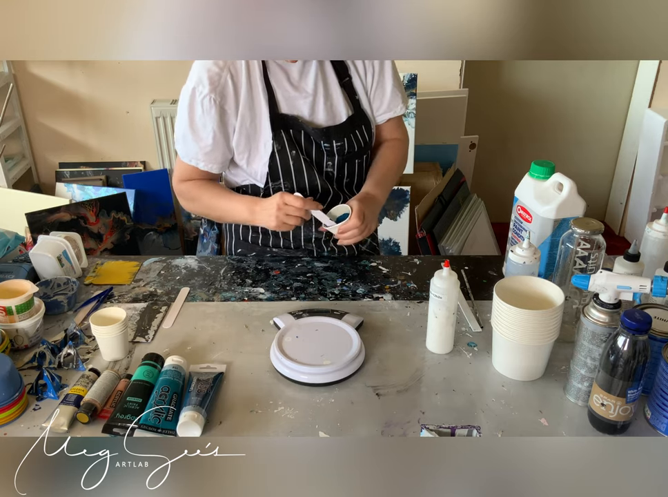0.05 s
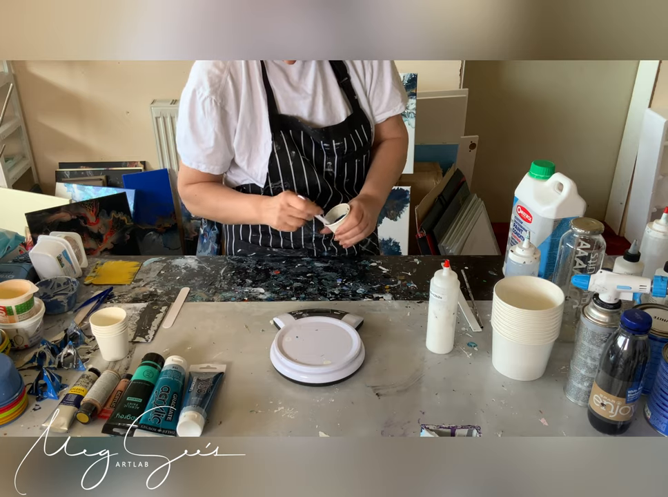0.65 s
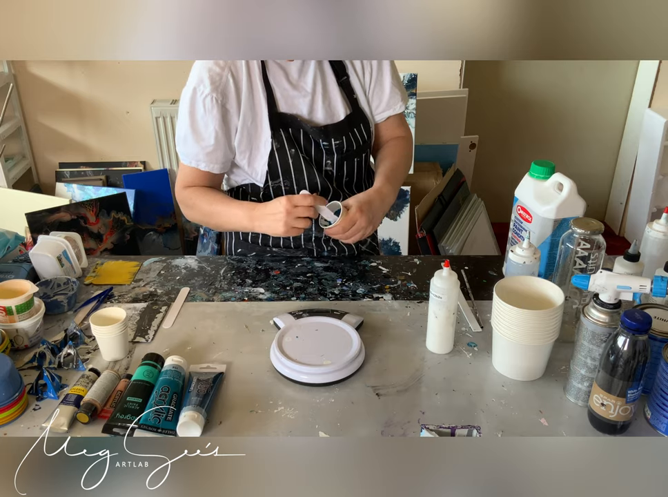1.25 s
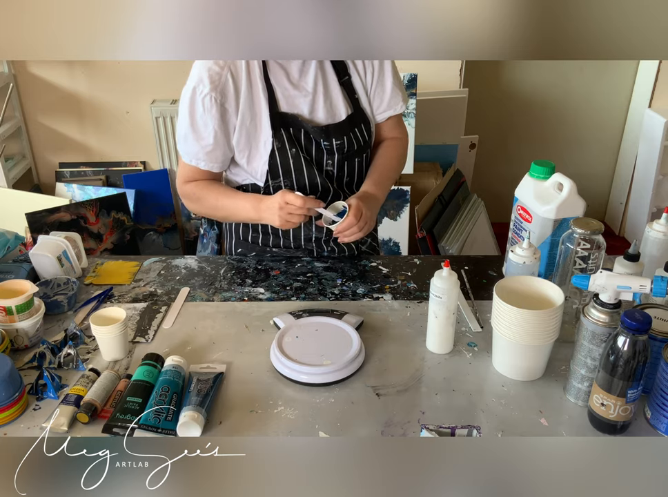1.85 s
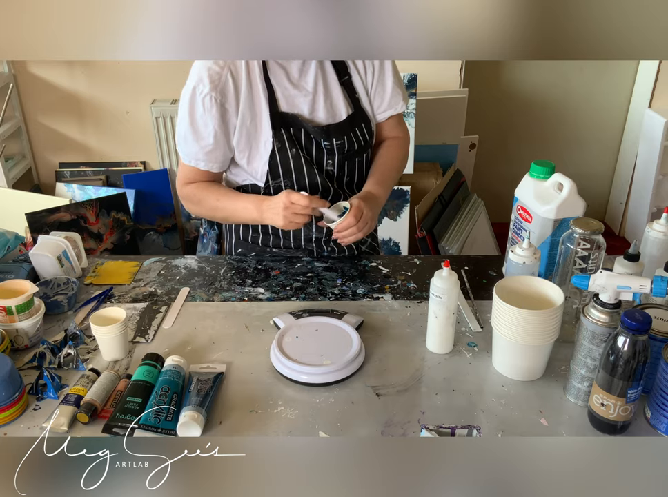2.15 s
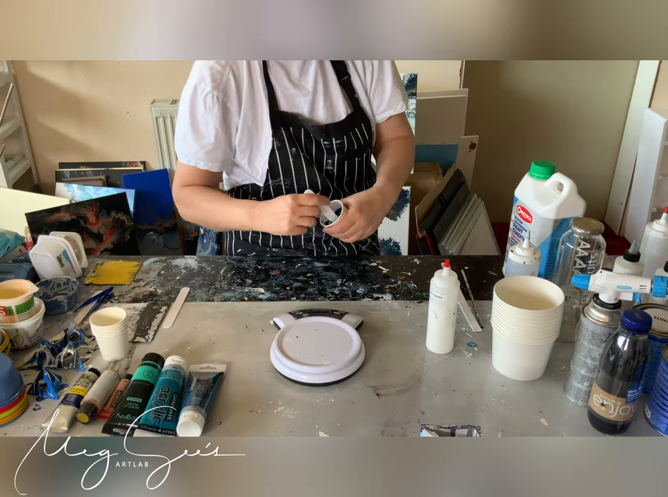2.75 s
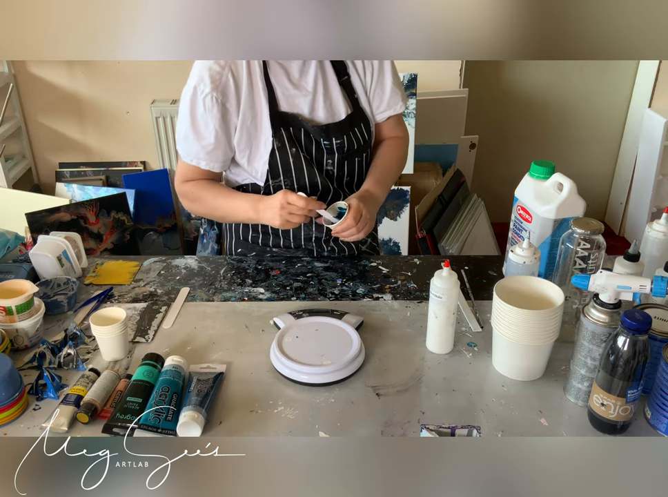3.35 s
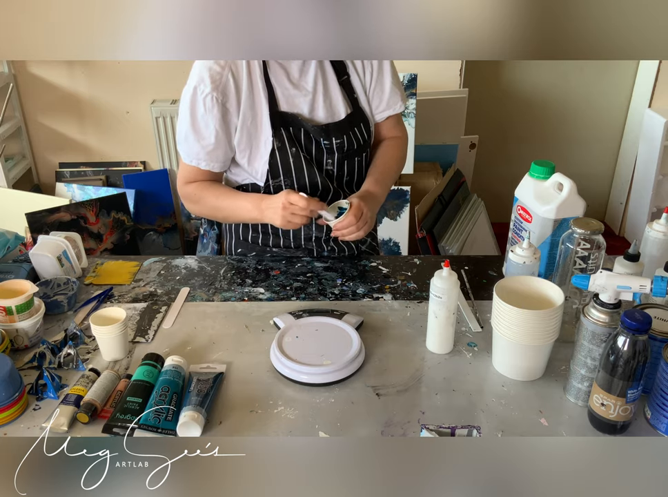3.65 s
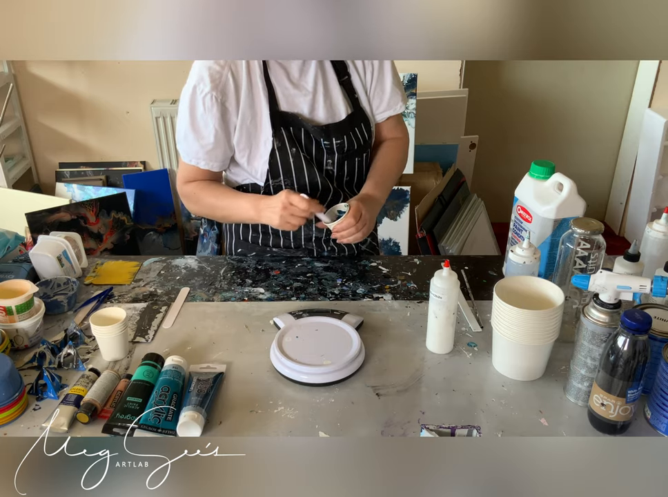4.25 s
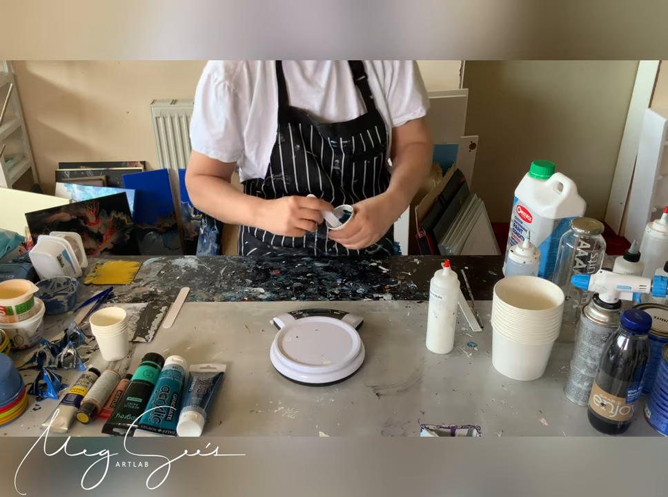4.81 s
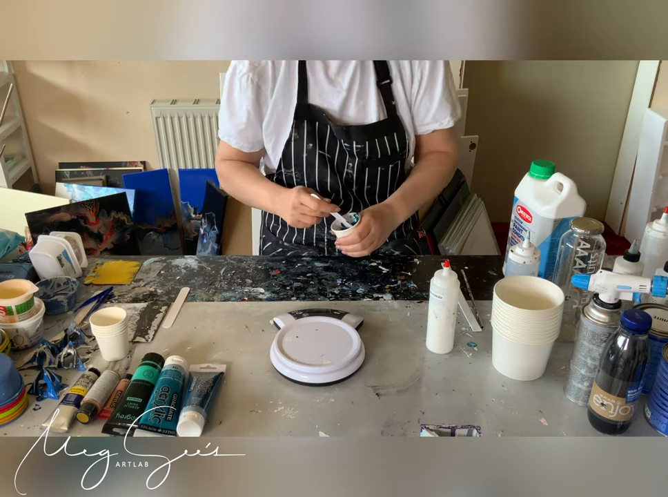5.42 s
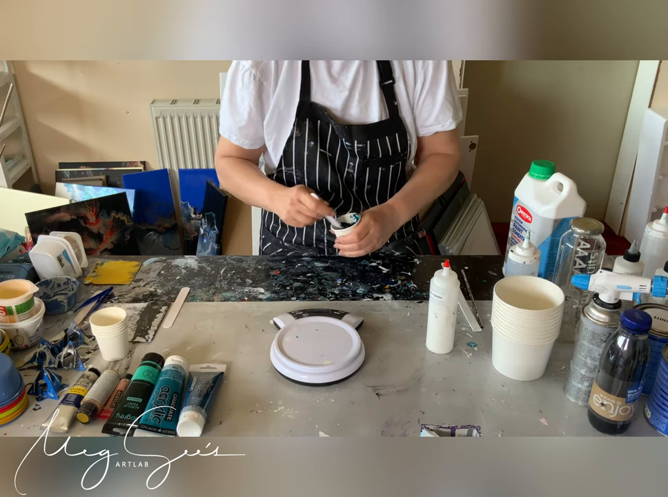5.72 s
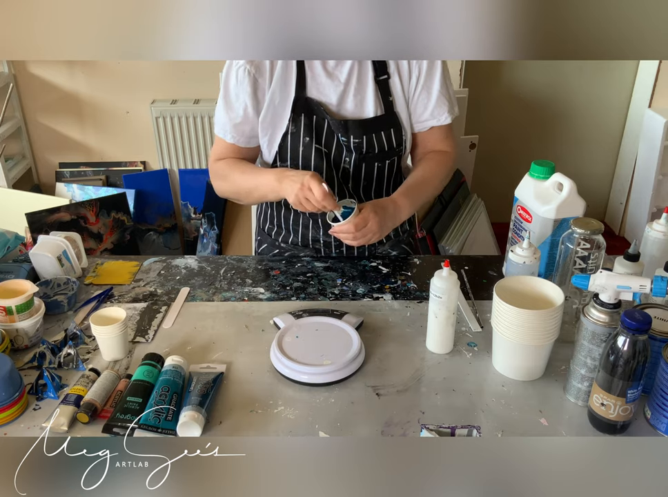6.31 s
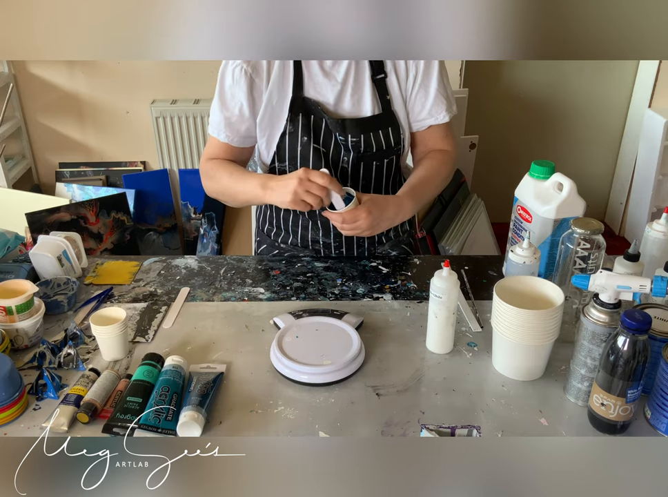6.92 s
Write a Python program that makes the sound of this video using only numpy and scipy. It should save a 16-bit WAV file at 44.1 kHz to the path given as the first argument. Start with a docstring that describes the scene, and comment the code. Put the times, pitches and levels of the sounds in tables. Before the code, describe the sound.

A plastic stick stirs thick paint in a paper cup with quick, wet scrapes, squelches and light ticks.

```python
"""Quick, wet scrapes: a plastic stick stirs thick paint in a hand-held paper cup, in a small work room.
Tiny slips along the wall hiss and shake the hollow cup, while the paint sizzles, squelches and snaps.
The stick ticks against the cup, and chatters into a thin singing note when wiped along the rim.
Midway the painter shifts her stance with a dull bump, and her apron rustles."""
import sys
import numpy as np
from scipy import signal
from scipy.fft import rfft, irfft, next_fast_len
from scipy.io import wavfile
from scipy.ndimage import uniform_filter1d, map_coordinates

SR = 44100
rng = np.random.default_rng(int(sys.argv[2]) if len(sys.argv) > 2 else 0)


def generate_wav(sig):
    """Save sig (samples, or channels by samples) to the path in sys.argv[1] as 16-bit PCM at SR."""
    pcm = np.round(np.clip(np.atleast_2d(sig).T, -1, 1) * 32767).astype(np.int16)
    wavfile.write(sys.argv[1], SR, pcm)


N = 316241
TIME = np.arange(N) / SR


def amp(db):
    """Decibels to gain."""
    return 10 ** (np.asarray(db) / 20)


def unit(x):
    """x at rms 1."""
    return x / np.sqrt(np.mean(x ** 2) + 1e-20)


def along(points, hz):
    """(Hz, value) points read on a log axis."""
    f, v = np.transpose(points)
    return np.interp(np.log(hz + 1), np.log(f + 1), v)


def curve(rows):
    """An automation curve through (time [s], value) rows."""
    return np.interp(TIME, *np.transpose(rows))


def swell(start, peak, end, db, swell_db, fade_db_per_s=1505):
    """Gain of one gesture: up by swell_db to its peak and back, with a fast fade either side."""
    outside = np.maximum(start - TIME, 0) + np.maximum(TIME - end, 0)
    below_peak_db = np.interp(TIME, [start, peak, end], [swell_db, 0, swell_db])
    return amp(db - below_peak_db - fade_db_per_s * outside)


def wobble(rate):
    """A smooth random curve, rate knots a second."""
    return map_coordinates(rng.standard_normal(int(N * rate / SR) + 4), [TIME * rate])


def slips(rate, spread_db):
    """Tiny random slips of uneven but bounded size, rate a second."""
    happens = rng.random(N) < rate / SR
    size = np.minimum(rng.standard_normal(N), 2)
    return unit(happens * rng.choice([-1, 1], N) * amp(spread_db * size))


def bursts(rows, t60_s):
    """A fast-dying burst of noise for each (time [s], level [dB]) row."""
    out, t = np.zeros(N + SR), np.arange(SR // 20) / SR
    for s, db in rows:
        out[round(s * SR):][:len(t)] += amp(db - 60 * t / t60_s) * rng.standard_normal(len(t))
    return out[:N]


def filtered(x, response):
    """x times a complex response of frequency."""
    size = next_fast_len(N + SR // 2)
    return irfft(rfft(x, size) * response(np.fft.rfftfreq(size, 1 / SR)), size)[..., :N]


def coloured(x, eq):
    """x through an EQ of (frequency [Hz], gain [dB]) points."""
    return filtered(x, lambda hz: amp(along(eq, hz)))


def ringing(x, hz, width_hz):
    """A band-pass resonance at a steady or moving frequency."""
    turn = np.exp(2j * np.pi * np.cumsum(np.broadcast_to(hz, N)) / SR)
    keep = np.exp(-np.pi * width_hz / SR)  # what is left of the ring after one sample
    return (turn * signal.lfilter([1 - keep, 1 - keep], [1, -keep], x / turn)).real


def resonance(x, hz, width_hz):
    """A ring with steep skirts, at rms 1."""
    return unit(ringing(ringing(x, hz, width_hz), hz, width_hz))


def modes(x, table):
    """x through a bank of steady resonances."""
    return sum(amp(db) * resonance(x, hz, width) for hz, width, db in table)


# colour of the room tone: (frequency [Hz], gain [dB])
ROOM_TONE_EQ = [(25, -21), (45, -2), (70, 11.5), (130, -1), (300, -4), (700, -14), (1400, -2.5),
                (2600, -19.5), (6000, -12.5), (16000, -23.5)]


def room_tone():
    """A bed of quiet air, nearly alike on both sides."""
    mid, side = unit(coloured(rng.standard_normal((2, N)), ROOM_TONE_EQ))
    side = amp(-11.5) * side
    return amp(-74.5) * np.array([mid + side, mid - side])


# reverb decay: (frequency [Hz], time to fall 60 dB [s])
ROOM_DECAY = [(150, 0.41), (1400, 0.39), (5000, 0.34), (14000, 0.21)]


def echo_tail():
    """A pair of room tails after a short pre-delay; each frequency dies at its own speed."""
    hz, t, spectra = signal.stft(rng.standard_normal((2, SR // 2)), SR, nperseg=256)
    decay = amp(-60 * t / along(ROOM_DECAY, hz)[:, None])
    tails = signal.istft(spectra * decay, SR, nperseg=256)[1]
    return np.pad(tails / np.linalg.norm(tails[0]), ((0, 0), (SR // 300, 0)))


# reverb return: (frequency [Hz], gain [dB])
ECHO_EQ = [(200, -1.5), (1300, -5), (3000, -12), (9000, -5.5)]
# reverb width: (frequency [Hz], side over mid [dB])
ECHO_WIDTH = [(60, -13), (300, -7), (800, 4.5), (1500, -3), (3000, -0.5), (12000, -7.5)]
# the room's low boom: (frequency [Hz], gain [dB])
STANDING_WAVES = [(119, 4), (147, -2), (196, 2.5), (288, -6), (311, -4)]


def room(x, renew_s=0.4):
    """Direct sound, standing waves and stereo echoes, whose pattern keeps changing as the hands move."""
    echo, step = np.zeros((2, N + 2 * SR)), round(renew_s * SR)
    padded = np.pad(x, (step, 2 * step))
    crossfade = np.sin(np.linspace(0, np.pi, 2 * step))
    for start in range(0, N + step, step):
        piece = crossfade * padded[start:start + 2 * step]
        wet = signal.fftconvolve(piece[None], echo_tail(), axes=1)
        echo[:, start:start + wet.shape[1]] += wet
    mid, side = coloured(echo[:, step:step + N], ECHO_EQ)
    mid = mid + sum(amp(db) * ringing(x, hz, width_hz=7.6) for hz, db in STANDING_WAVES)
    side = coloured(side, ECHO_WIDTH)
    return np.array([x + mid + side, x + mid - side])


# a low hum: (start [s], peak [s], end [s], level [dB], swell [dB])
HUM_SWELLS = [(5.78, 5.9, 6.08, -69, 6)]


def hum():
    """A faint, rough low tone comes and goes."""
    tone = unit(ringing(rng.standard_normal(N), hz=310, width_hz=13))
    return sum(swell(*row) for row in HUM_SWELLS) * tone


# cloth slides: (start [s], peak [s], end [s], level [dB], swell [dB])
APRON_SLIDES = [(4.83, 4.926, 5.23, -54, 13), (5.79, 5.82, 5.98, -63, 8), (6.18, 6.2, 6.24, -67, 3),
                (6.43, 6.6, 6.63, -64, 9)]
# soft colour of the cloth: (frequency [Hz], gain [dB])
CLOTH_EQ = [(50, -8), (130, -6), (320, 0), (800, -2), (1500, -2), (4000, -74)]


def apron():
    """Cloth slides on cloth with a fluttering rustle."""
    rustle = unit(coloured(amp(1.2 * wobble(40)) * rng.standard_normal(N), CLOTH_EQ))
    return sum(swell(*row) for row in APRON_SLIDES) * rustle


# shifts of weight: (start [s], peak [s], end [s], level [dB], swell [dB])
STANCE_SHIFTS = [(4.39, 4.475, 4.58, -44.5, 13), (4.625, 4.642, 4.68, -57, 12), (6.18, 6.225, 6.24, -69, 5)]
# dark colour of the bump: (frequency [Hz], gain [dB])
BUMP_EQ = [(25, -38), (70, -9), (110, -2), (145, -1), (200, -2.5), (300, -1), (550, -10), (1200, -13.5),
           (2500, -36)]


def stance():
    """The painter changes her stance with a dull, scuffing bump."""
    bump = unit(coloured(slips(rate=900, spread_db=2), BUMP_EQ))
    return sum(swell(*row) for row in STANCE_SHIFTS) * bump


# paint snaps: (time [s], level before EQ [dB])
SNAPS = [(2.191, -19), (2.199, -32), (5.935, -40), (6.069, -50), (6.207, -47)]
# colour of a snap: (frequency [Hz], gain [dB])
SNAP_EQ = [(200, -60), (1500, -18), (7000, 7), (15000, -7.5)]


def snapping():
    """Paint tears from the wall with a thin, bright snap."""
    return coloured(bursts(SNAPS, t60_s=0.0099), SNAP_EQ)


# the cup's air note: (time [s], pitch [Hz])
AIR_NOTE = [(0.0, 1625), (0.11, 1515), (2.32, 1490), (2.45, 1720), (2.63, 1540), (4.1, 1473), (5.63, 1430),
            (7.0, 1420)]
# modes of its wall and air: (pitch [multiple of the air note], width [Hz], gain [dB])
CUP_MODES = [(.33, 176, -22), (.67, 266, -18), (.88, 150, -5.5), (1.03, 130, 3.5), (1.42, 330, -16)]


def cup(x):
    """The hollow body of the paper cup; its note moves as stick and hand shade the opening."""
    note = curve(AIR_NOTE) * np.exp(0.012 * wobble(15))  # the circling stick nudges it
    return sum((-1) ** k * amp(db) * ringing(x, multiple * note, width)
               for k, (multiple, width, db) in enumerate(CUP_MODES))


# the stick taps the cup: (time [s], crack drive [dB], push on the wall [dB])
TAPS = [(0.2186, -36.5, -9), (0.2764, -35, -14), (0.349, -29, -17), (0.7769, -27.5, 13.5),
        (1.5925, -41, -28), (1.8803, -25, -9), (2.191, -34.5, 7.5), (3.401, -26.5, -11), (3.467, -42, 1),
        (3.587, -31.5, 0.5), (3.907, -32.5, -22), (4.685, -47.5, -15.5), (5.327, -31, -7.5),
        (5.3998, -40, -18), (5.4187, -30.5, -13), (5.935, -35, -15), (6.1747, -37.5, -8),
        (6.727, -50.5, -33)]
# modes of the cup's base: (frequency [Hz], width [Hz], level [dB])
BASE_MODES = [(960, 78, -9), (1260, 170, 3.5)]
BASE_DB, BASE_DECAY_DB_PER_S = -38, 328


def ticking():
    """Each tap is a dry crack, a knock on the cup and a thud of paint; the hardest flexes the base."""
    bites = bursts([tap[:2] for tap in TAPS], t60_s=0.012)
    pushes = np.zeros(N)
    for s, _, push_db in TAPS:
        pushes[round(s * SR)] += amp(push_db)
    age = TIME - max(TAPS, key=lambda tap: tap[2])[0]  # since the hardest push
    flex = (age > 0) * amp(BASE_DB - BASE_DECAY_DB_PER_S * np.abs(age))
    base = flex * modes(rng.standard_normal(N), BASE_MODES)
    crack = coloured(bites, FRICTION_EQ)
    knock = coloured(cup(pushes), [(150, -21), (650, -6), (1200, 0)])
    thud = amp(-0.5) * ringing(bites, hz=445, width_hz=180)
    return crack + knock + thud + base


# wipes along the rim:
# (start [s], rise [s], fall [s], level [dB], swell [dB], first pitch [Hz], last pitch [Hz])
RIM_WIPES = [(0.0, 0.017, 0.036, -48, 1, 3850, 3700), (1.2, 0.12, 0.2, -43.5, 19.5, 4080, 3690),
             (1.62, 0.12, 0.064, -49, 3.5, 4020, 3640), (2.428, 0.015, 0.023, -39, 15, 3500, 3680),
             (2.76, 0.1, 0.39, -52.5, 5, 3600, 3910), (4.78, 0.12, 0.19, -39, 10, 3660, 3480),
             (6.289, 0.27, 0.059, -43.5, 9, 3650, 3380), (6.796, 0.0077, 0.034, -36, 25, 4120, 4330),
             (6.85, 0.048, 0.072, -55.5, -1, 4380, 4030)]
# the rim's steady resonances: (frequency [Hz], width [Hz], level [dB])
RIM_MODES = [(1050, 560, -17), (4500, 520, -8), (5700, 420, -7.5), (8300, 2400, -10.5)]


def wiping():
    """On the rim the stick chatters, rasps and sings a note that glides with its free length."""
    pressure, glides = np.zeros(N), []
    for start, rise, fall, db, swell_db, first_hz, last_hz in RIM_WIPES:
        end = start + rise + fall
        pressure += swell(start, start + rise, end, db, swell_db)
        glides += [(start, first_hz), (end, last_hz)]
    # a light wipe stutters between sticking and sliding; a firm one runs smoothly
    stutter_db = 7 / (1 + pressure / amp(-48))
    chatter = unit(amp(stutter_db * np.tanh(wobble(220))) * slips(rate=2700, spread_db=6.5))
    pitch = curve(sorted(glides)) * np.exp(0.014 * wobble(37))  # wavers with the grip
    ring = unit(resonance(chatter, pitch, width_hz=260) + modes(chatter, RIM_MODES))
    rasp = amp(-16.5) * unit(coloured(chatter, FIZZ_EQ))
    return pressure * (ring + rasp)


def gurgle(force, ceiling_db=-69.5, firm_stroke_db=-42):
    """Air pockets open behind the blade at a wandering low pitch, levelling off at a firm stroke."""
    gain = amp(ceiling_db) * np.tanh(force / amp(firm_stroke_db)) ** 0.59
    pockets = amp(3 * wobble(25)) * slips(rate=330, spread_db=5.5)
    pitch = 430 * np.exp(0.21 * wobble(13))
    return gain * unit(ringing(pockets, pitch, width_hz=105))


# paint pressed against the wall: (crest [s], hiss [dB], cup tone [dB], sizzle [dB], build-up [s])
PAINT_SQUELCHES = [(0.094, -37, -44, -48, 0.018), (0.339, -36, -58, -44.5, 0.0081),
                   (0.401, -37.5, -46, -64, 0.0066), (0.547, -37, -43, -50.5, 0.023),
                   (0.584, -42, -48, -54, 0.005), (0.672, -43.5, -44, -70, 0.063),
                   (0.777, -35, -36, -43, 0.021), (0.88, -40, -76, -54, 0.023),
                   (0.987, -48.5, -61.5, -66, 0.015), (1.801, -51.5, -73, -48, 0.019),
                   (1.96, -31, -43.5, -46, 0.0073), (2.193, -33.5, -40, -43, 0.028),
                   (2.451, -36.5, -41, -47, 0.0084), (3.483, -33, -41, -42, 0.014),
                   (3.57, -44.5, -57, -57, 0.03), (3.714, -35, -39.5, -38.5, 0.02),
                   (3.795, -41, -61, -50, 0.028), (3.826, -43.5, -39, -51, 0.025),
                   (3.913, -41, -53, -63, 0.024), (3.936, -34.5, -48, -39.5, 0.014),
                   (3.965, -52, -56, -45, 0.0062), (4.007, -53, -43.5, -50, 0.0061),
                   (4.05, -41.5, -46, -49, 0.011), (4.157, -38.5, -54, -48, 0.021),
                   (4.19, -44, -68, -49, 0.0086), (4.278, -42, -50, -52.5, 0.059),
                   (4.398, -37.5, -40, -48, 0.024), (4.904, -38, -50, -40.5, 0.015),
                   (5.322, -43, -57, -63, 0.018), (5.442, -41.5, -50, -49, 0.0049),
                   (5.513, -42, -68, -61, 0.007), (5.539, -38, -46.5, -56, 0.021),
                   (5.64, -45, -64, -50.5, 0.04), (5.672, -61, -63, -49, 0.008),
                   (5.811, -49.5, -48, -65, 0.023), (5.885, -46.5, -54, -57, 0.018),
                   (6.557, -39.5, -75, -51, 0.025), (6.817, -47.5, -62, -50, 0.008)]
SLIP_OFF, ROUNDNESS = 0.58, 1.31  # fall time over build-up time; 1 = pointed crest, 2 = round


def squelches():
    """Power of hiss, cup tone and sizzle: each squelch builds, then drops as the blade slips off."""
    power = np.zeros((3, N))
    for crest, *levels_db, rise in PAINT_SQUELCHES:
        distance = np.abs(TIME - crest) / np.where(TIME < crest, rise, SLIP_OFF * rise)
        envelope = np.exp(-np.minimum(distance, 10) ** ROUNDNESS)
        power += np.outer(amp(levels_db), envelope) ** 2
    return power


# strokes over the wall:
# (start [s], end [s], first hiss [dB], last hiss [dB], cup tone over hiss [dB], sizzle over hiss [dB])
WALL_STROKES = [ (0.0, 0.064, -47.5, -58.5, 4, -6), (0.1, 0.123, -44, -48, -10, -4.5),
                (0.22, 0.282, -61, -60, -6, -5), (0.321, 0.472, -47, -50.5, -6, -5),
                (0.51, 0.675, -56, -48, -10, -4.5), (0.757, 0.917, -49, -59, -10, -5),
                (0.996, 1.114, -65, -69, -45, -4), (1.165, 1.255, -65.5, -56, -9.5, -6.5),
                (1.26, 1.407, -55, -53.5, -7.5, -0.5), (1.427, 1.55, -62.5, -57.5, -3, -13),
                (1.595, 1.805, -54, -54.5, -2.5, -14), (1.887, 1.945, -63, -48, -4.5, -7),
                (1.949, 1.986, -36.5, -44, -4.5, -9), (2.004, 2.105, -41, -47, -8.5, -5.5),
                (2.16, 2.309, -55, -44, -3.5, -12), (2.427, 2.452, -45.5, -49.5, 2.5, -1),
                (2.563, 2.674, -68, -74.5, -28, -7), (2.678, 2.732, -52.5, -56, -9.5, -6.5),
                (2.768, 3.173, -57.5, -53.5, -7, -8.5), (3.19, 3.282, -56, -49.5, 0, -4),
                (3.465, 3.62, -51.5, -47, -5.5, -9), (3.674, 3.86, -49.5, -55, -9, -6.5),
                (3.912, 4.106, -49, -50, -4.5, -15), (4.12, 4.302, -58.5, -46.5, -4, -14.5),
                (4.337, 4.451, -63, -48, -12, -2.5), (4.49, 4.634, -68, -57, -2.5, 1.5),
                (4.684, 4.763, -59, -44.5, -10, -1.5), (4.73, 4.93, -52, -47.5, -7.5, 0.5),
                (4.933, 5.213, -48, -49, -1, -7.5), (5.235, 5.31, -65, -53, 0, -4),
                (5.398, 5.485, -42.5, -57.5, -10, -3), (5.467, 5.679, -51, -48.5, -4, -16),
                (5.702, 5.9, -48, -57, -8, -16.5), (5.925, 5.982, -58.5, -54, -15, -1.5),
                (6.03, 6.17, -89, -64.5, -8, -11), (6.199, 6.28, -61, -69, -4, -12),
                (6.287, 6.619, -52.5, -51.5, -6, -6.5), (6.818, 6.961, -48, -52, -7.5, -1.5)]
ATTACK_S, RELEASE_DB_PER_S = 0.0024, 338


def strokes():
    """Power of hiss, cup tone and sizzle: the stick bites, drags with drifting force and eases off."""
    power = np.zeros((3, N))
    for start, end, first_db, last_db, cup_db, sizzle_db in WALL_STROKES:
        bite = np.clip((TIME - start) / ATTACK_S, 0, 1)
        drag_db = np.interp(TIME, [start, end], [first_db, last_db])
        release_db = RELEASE_DB_PER_S * np.maximum(TIME - end, 0)
        power += np.outer(amp([0, cup_db, sizzle_db]), bite * amp(drag_db - release_db)) ** 2
    return power


def patchy(x, depth_db):
    """Fleeting colours, at rms 1: the paint film and the contact point keep changing."""
    spectra = signal.stft(x, nperseg=512)[2]
    patches = uniform_filter1d(rng.standard_normal(spectra.shape), size=4, axis=0)
    patches = uniform_filter1d(patches, size=4, axis=1)
    return unit(signal.istft(spectra * amp(depth_db * unit(patches)), nperseg=512)[1][:N])


# plastic on paper, for scrapes and ticks: (frequency [Hz], gain [dB])
FRICTION_EQ = [(100, -48), (300, -46), (900, -10.5), (1800, -6), (2700, 1.5), (3500, 3), (4600, 3),
               (6000, 2), (7300, -2.5), (9500, -9), (12500, -28.5), (16000, -35)]
# top-end fizz of the paint film and the rim's rasp: (frequency [Hz], gain [dB])
FIZZ_EQ = [(5000, -18), (8500, 6.5), (10500, 1.5), (12500, -3), (16000, -16.5)]


def scraping():
    """The stick drags over the wall: dense slips hiss and shake the cup, the paint sizzles and gurgles."""
    force, shake, wetness = np.sqrt(strokes() + squelches())
    grip = amp(1.88 * wobble(60) + 0.31 * wobble(390))  # the tip catches and lets go
    drag = grip * slips(rate=7000, spread_db=1.5)
    crackle = amp(-10) * slips(rate=260, spread_db=3)  # sticky threads of paint snap
    hiss = force * patchy(coloured(drag + crackle, FRICTION_EQ), depth_db=4)
    film = grip * slips(rate=2200, spread_db=3.5)
    sizzle = wetness * patchy(coloured(film, FIZZ_EQ), depth_db=3)
    hollow = shake * patchy(coloured(cup(drag), [(500, -1.5), (1300, -5.5)]), depth_db=1)
    return hiss + sizzle + hollow + gurgle(force)


def scene():
    """Stick, cup and painter in the room, over the hum and the room tone."""
    foley = scraping() + wiping() + ticking() + snapping() + stance() + apron()
    return room(foley) + hum() + room_tone()


# phase between the sides: (frequency [Hz], left lead [rad])
STEREO_PHASE = [(340, 0), (700, .9), (1600, 0), (1900, -1.2), (2250, -1.5), (2800, -3.1), (3600, -5.3),
                (4400, -6), (7200, -5.7), (8400, -6.28)]
# balance: (frequency [Hz], left over right [dB])
STEREO_BALANCE = [(300, 0), (700, 4.5), (1400, 2.2), (2500, .5), (8000, -.7)]


def record(dry, top_hz=15900):
    """The stereo image: two microphone ports differ in phase and level; nothing passes above top_hz."""
    sides = np.array([[1], [-1]]) / 2

    def ports(hz):
        gain = amp(sides * along(STEREO_BALANCE, hz))
        phase = sides * along(STEREO_PHASE, hz)
        return gain * np.exp(1j * phase) * (hz < top_hz)
    return filtered(dry, ports)


dry = scene()
out = record(dry)
generate_wav(out)
```